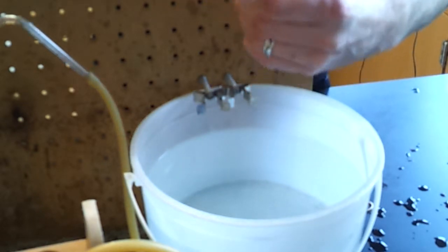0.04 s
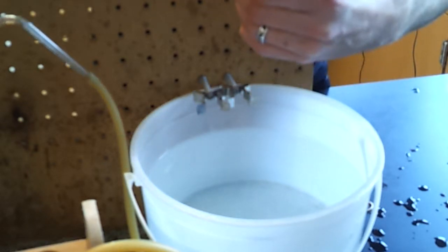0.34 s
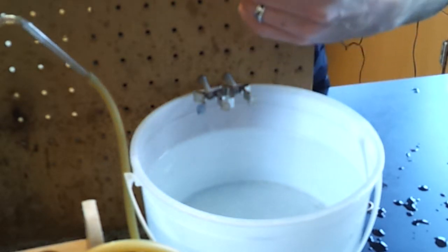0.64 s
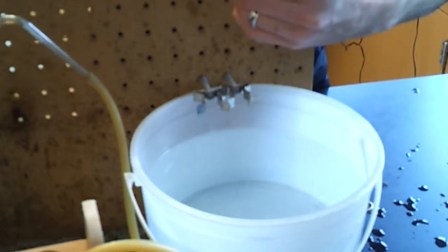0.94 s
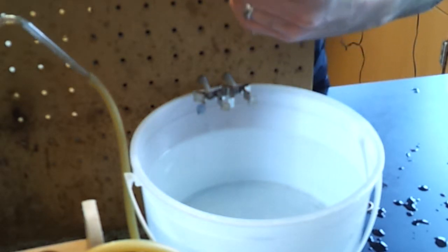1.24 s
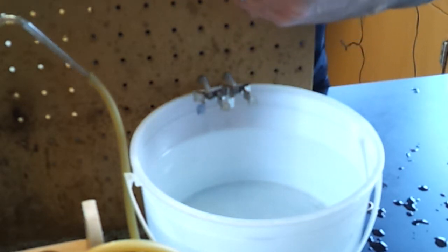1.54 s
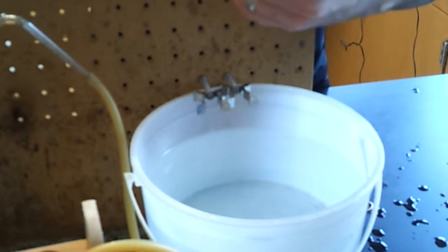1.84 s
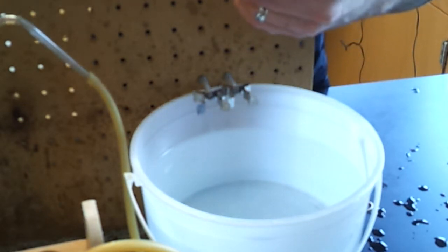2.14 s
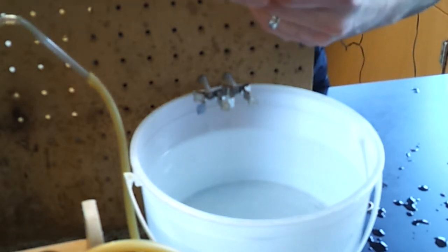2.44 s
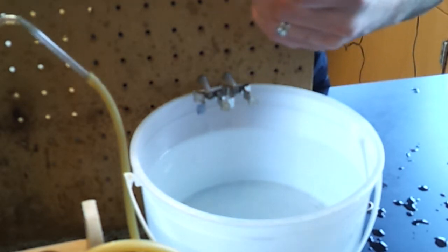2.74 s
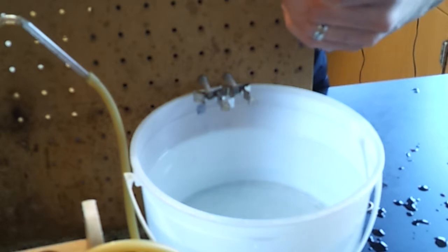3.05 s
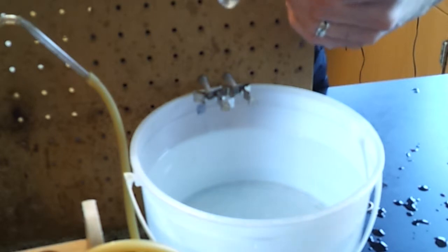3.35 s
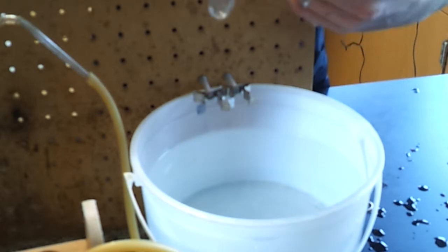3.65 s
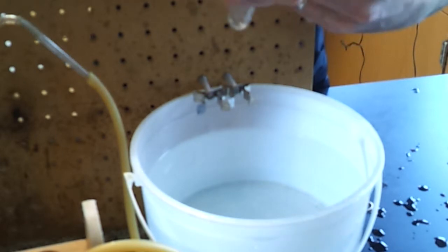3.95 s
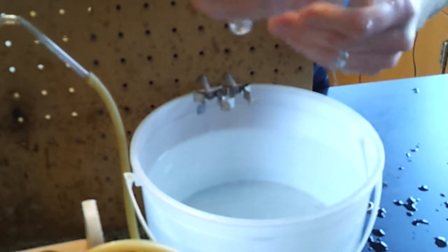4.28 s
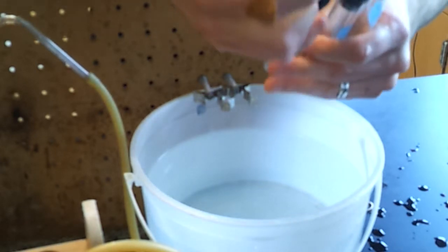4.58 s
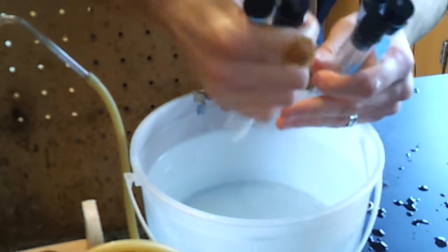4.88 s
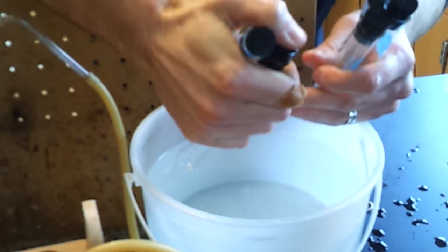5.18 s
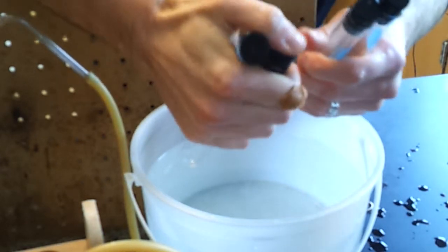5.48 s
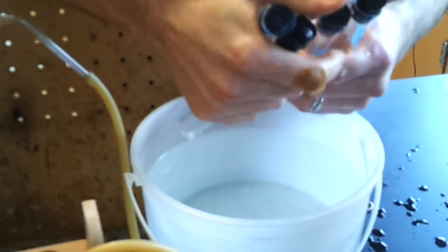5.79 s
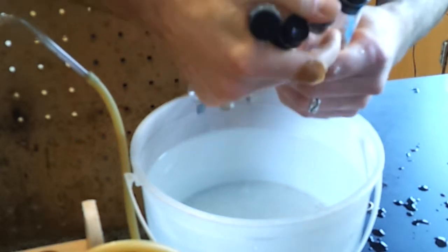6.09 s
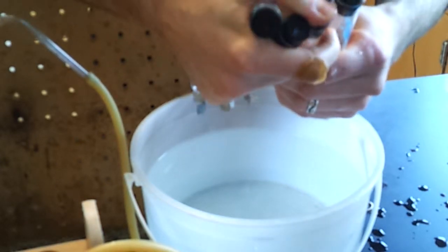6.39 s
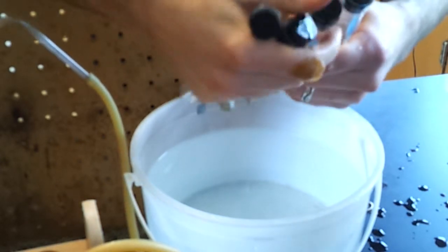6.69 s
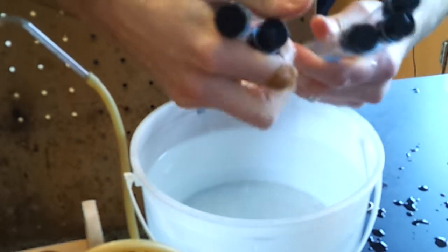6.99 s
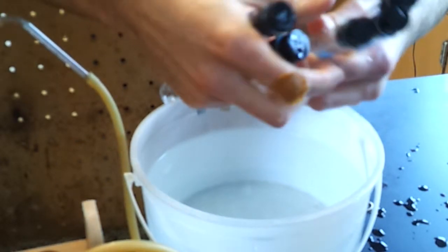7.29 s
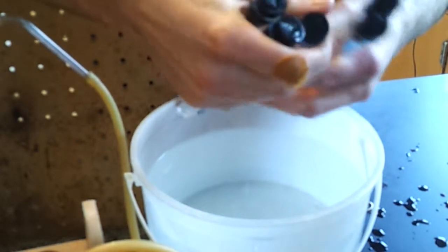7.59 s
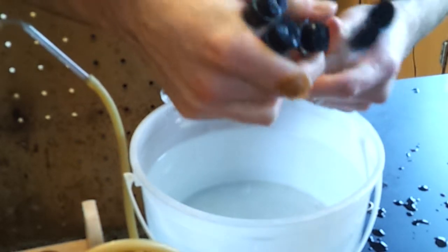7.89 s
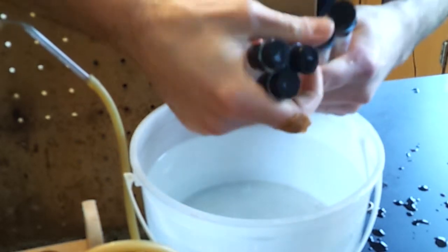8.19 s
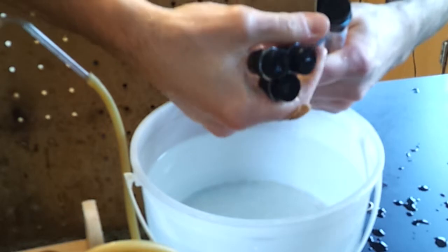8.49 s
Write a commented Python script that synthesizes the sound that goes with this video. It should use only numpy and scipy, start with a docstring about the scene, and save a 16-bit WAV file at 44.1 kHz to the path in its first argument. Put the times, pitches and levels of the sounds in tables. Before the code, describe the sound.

Ventilation rumbles and hums steadily in a small workshop, with a faint hiss. Capped plastic test tubes are handled close by, each click followed by a short room reflection. A faint slide comes just before 1 second, and caps catch in a brief rasping stutter around 1.5 seconds. A soft slide and a thin, quiet ring follow just after 2 seconds, then a light tap at 2.6. From 3.9 to 4.7 seconds the tubes clink and knock in a quick, uneven run, sharpest at 4.3 and 4.6. Small scraping ticks come at about 5.6 and 6 seconds. At 7.1 the caps stutter again, more strongly. The loudest clinks land at 7.5 and 7.9 seconds, the second with a small hollow bump. A few light ticks follow until about 8.3 seconds, leaving only the hum.

```python
"""Gathering plastic test tubes

Capped tubes pass from one hand into the other above a bucket in a small workshop. Their walls clink
and slide, and their caps knock and stutter past each other. One light touch leaves a thin ring, and
the bundle closes with a hollow bump. Bucket, bench and pegboard throw the clicks back, while
ventilation rumbles and hums underneath, along with a steady hiss."""
import sys
import numpy as np
from scipy import signal
from scipy.fft import rfft, irfft, next_fast_len
from scipy.io import wavfile
from scipy.ndimage import uniform_filter1d, minimum_filter1d

SR = 44100
rng = np.random.default_rng(int(sys.argv[2]) if len(sys.argv) > 2 else 0)


def dump_mix(stems):
    """Bounce the given channels to the path in sys.argv[1] as a 16-bit WAV at rate SR."""
    frames = np.atleast_2d(stems).T  # one column per channel
    limited = np.clip(frames, -1, 1)  # hard clip at full scale
    pcm = np.round(limited * 32767).astype(np.int16)
    wavfile.write(sys.argv[1], SR, pcm)


N = 376173

# Tube hits tube. Each row: start in seconds, relative levels of wall clink and cap knock in dB,
# hardness as a treble boost in dB, centre of the knock in Hz.
CONTACTS = [(2.2784, -48, -65, 4, 1580), (2.5733, -30.5, -43, -9, 2060), (3.9471, -27, -36, -6, 2680),
            (4.0632, -19.5, -33, -0.5, 2120), (4.2112, -40.5, -48.5, 1, 2530),
            (4.3022, -10.5, -27, -8.5, 3200), (4.4724, -37, -43, -6, 3300),
            (4.5374, -26.5, -44, -9.5, 2610), (4.592, -4.5, -26, -3, 2080),
            (4.6656, -22.5, -34.5, -10, 3040), (4.7312, -39, -55, 3, 2660),
            (7.4523, -21.5, -33.5, 11, 3370), (7.5423, -0.5, -36, 0.5, 2800), (7.722, -41, -46.5, -1, 2620),
            (7.794, -39, -56, -4, 2400), (7.8202, -24, -44.5, 3, 2600), (7.8534, -4.5, -22, 2.5, 2610),
            (8.157, -41, -62, 14, 2030), (8.221, -27, -44, -7, 2980)]
def strikes(bounce_above_db=-15, bounces=2, first_gap_s=0.006, gap_shrink=0.61, cap_loss_share=0.47):
    """List every hit. Hard ones bounce, ever sooner; the harder the hit, the less a bounce loses."""
    for start, clink_db, knock_db, hard_db, knock_hz in CONTACTS:
        yield start, clink_db, knock_db, hard_db, knock_hz
        if clink_db > bounce_above_db:
            loss_db = -1.5 * clink_db
            for k in range(1, bounces + 1):
                start += first_gap_s * gap_shrink ** (k - 1)
                yield start, clink_db - k * loss_db, knock_db - k * cap_loss_share * loss_db, hard_db, knock_hz


# The notes of a tube's wall, then of its cap and hollow inside.
# Each row: pitch in Hz, relative level in dB, seconds to fade by 60 dB.
WALL_NOTES = [(3930, -10, .06), (4175, -6, .06), (4487, -1, .07), (4763, -2, .17), (4899, -6, .17),
              (5055, -2, .05), (5185, -4, .11), (5355, -2, .06), (5508, 0, .09), (5767, -5, .08),
              (6055, -3, .05), (6250, -7, .04), (6650, -6, .04)]
CAP_NOTES = [(709, -14, 0.034), (1066, -5.5, .02), (1570, -11, 0.009), (2060, -4, 0.016), (2112, 8.5, 0.03),
             (2360, 2.5, 0.024), (2520, -2, 0.031), (2770, -7, 0.02), (3100, -15, 0.026), (3500, 0, .02)]
# The crack as wall or cap is hit. Each row: frequency in Hz, relative level in dB.
WALL_CRACK = [(300, -80.5), (1500, -48), (3000, -22.5), (3900, -11.5), (4500, 1), (5000, 2), (5500, 1.5),
              (6100, -9.5), (6700, -14), (7300, -19.5), (9000, -23.5)]
CAP_CRACK = [(100, -56), (500, -25.5), (1250, -10.5), (1650, -3.5), (2600, -2), (3400, 1), (4300, -3.5),
             (8000, -34)]
def tube_clinks(wall_db, cap_db, knock_width_hz, ring_send_db):
    """Each hit sounds both wall and cap. Returns the direct sound and the part sent into the room."""
    t = np.arange(SR // 3) / SR
    direct, sent = np.zeros((2, N))
    for start, clink_db, knock_db, hard_db, knock_hz in strikes():
        # Hard hits shake the tubes free to ring; after light ones the fingers still damp them.
        ring_db = 5 + 0.2 * clink_db
        force = pulse([(4500, 0.0029), (5700, hard_db)])   # hard contact favours the high notes
        wall = blow(WALL_NOTES, WALL_CRACK, t, ring_db - 7.5)
        wall = signal.fftconvolve(wall, force[None])[:, :len(t)]
        cap = blow(CAP_NOTES, CAP_CRACK, t, ring_db - 6.5)
        cap = resonate(cap, knock_hz, knock_width_hz)
        clink = from_db(clink_db + wall_db) * unit_energy(wall)
        knock = from_db(knock_db + cap_db) * unit_energy(cap)
        crack, ring = clink + knock
        add(direct, start, crack + ring)
        # Light touches lie deep in the hand and are heard more by way of the room.
        send_db = -4 - 0.1949 * clink_db
        add(sent, start, from_db(send_db) * (crack + from_db(ring_send_db) * ring))
    return direct, sent


def blow(notes, crack_shape, t, ring_db):
    """One hit as two rows: a sharp crack, and the ringing damped by the hand."""
    crack = np.zeros(len(t))
    add(crack, 0, pulse(crack_shape))
    ring = unit_energy(ringing(notes, t, vary_db=2.5, detune=0.00046))
    return np.array([crack, from_db(ring_db) * ring])


# Cap catches on cap. Each row: start in seconds, length in seconds, number of slips,
# relative levels of the last rasp and of the caps' tone in dB.
STUTTERS = [(1.5088, 0, 1, -42, -51), (1.5276, 0.0604, 4, -28, -39.5), (1.6206, 0, 1, -33, -41),
            (3.8991, 0.0035, 1, -38, -45.5), (5.554, 0, 1, -48, -43.5), (5.593, 0.0016, 1, -47, -50),
            (5.9653, 0.0033, 1, -37, -39.5), (7.09, 0.0243, 5, -22, -37), (8.1249, 0, 1, -38, -42),
            (8.313, 0.0025, 1, -44, -64)]
def cap_slips(held_db=-9.5):
    """List the evenly spaced slips. Those that catch again rasp less than the last, which breaks free."""
    for start, length, slips, rasp_db, tone_db in STUTTERS:
        for held_at in np.linspace(start, start + length, slips)[:-1]:
            yield held_at, rasp_db + held_db, tone_db
        yield start + length, rasp_db, tone_db


# The rasp of one slip. Each row: frequency in Hz, relative level in dB.
RASP_SHAPE = [(200, -50), (900, -27), (1500, -18), (2200, -1.5), (3000, -10.5), (3900, 0), (4600, 3.5),
              (5300, 7), (6200, -5.5), (7000, -11), (8500, -25)]
# Two caps ringing. Each row: pitch in Hz, relative level in dB, seconds to fade by 60 dB.
CAP_PAIR_NOTES = [(1860, -7, .012), (2050, -2.5, 0.015), (2148, 2.5, 0.028), (2420, -7.5, 0.021),
                  (2560, -9, 0.0095)]
def cap_stutters(rasp_gain_db, tone_gain_db, slip_s):
    """Each slip is a short rasp that sets the caps ringing near one note."""
    t = np.arange(SR // 8) / SR
    out = np.zeros(N)
    for start, rasp_db, tone_db in cap_slips():
        rasp = unit_energy(shaped_noise(RASP_SHAPE, len(t)) * np.exp(-t / slip_s))
        tone = unit_energy(ringing(CAP_PAIR_NOTES, t, vary_db=3, detune=0.015))
        add(out, start, from_db(rasp_db + rasp_gain_db) * rasp + from_db(tone_db + tone_gain_db) * tone)
    return out


# Tube slides on tube. Each row: start in seconds, length in seconds, level in dB, pitch in Hz.
SLIDES = [(0.742, 0.079, -58.5, 4900), (.93, 0.037, -67, 5000), (2.137, 0.048, -56.5, 4470),
          (3.905, 0.042, -62, 2300)]
def tube_slides(slips_per_s, width_hz):
    """Many tiny slips keep one note of a tube sounding while it slides."""
    out = np.zeros(N)
    for start, length, db, hz in SLIDES:
        size = int(length * SR)
        slips = rng.standard_normal(SR) * (rng.random(SR) < slips_per_s / SR)
        rub = unit_rms(resonate(slips[:size], hz, width_hz))
        add(out, start, from_db(db) * rub * signal.windows.tukey(size))
    return out


# The thin ring and the hollow bump. Each holds: start in seconds, level in dB.
PING = (2.151, -52)
BUMP = (7.854, -36)
# Their notes. Each row: pitch in Hz, relative level in dB, seconds to fade by 60 dB.
PING_NOTES = [(1610, -7, 1), (2428, -9, .15), (4400, 0, 0.36), (4759, -12, 0.31), (6950, 2, 0.18)]
BUMP_NOTES = [(695, -5.5, 0.15), (920, 1, 0.04), (1130, -7, 0.09), (2635, 10, 0.079), (2800, -3, 0.1)]
def ping_and_bump():
    """Two single touches on loosely held pieces, which are free to ring on."""
    t = np.arange(SR) / SR
    out = np.zeros(N)
    for (start, db), notes in [(PING, PING_NOTES), (BUMP, BUMP_NOTES)]:
        add(out, start, from_db(db) * ringing(notes, t, vary_db=4, detune=0))
    return out


# Echoes from bucket, bench and pegboard. Each row: delay in seconds, relative level in dB.
ECHOES = [(.0026, -29.5), (.0068, -7), (0.0127, -20.5), (0.0163, -20)]
def workshop(sound, early_db, early_fade_s, late_db, late_fade_s):
    """The room answers with a few hard echoes, quick scatter from nearby clutter, then a longer tail."""
    t = np.arange(SR // 2) / SR
    response = from_db(early_db) * scatter(t, early_fade_s, onset_s=0.00042)
    response += from_db(late_db) * scatter(t, late_fade_s, onset_s=0.014)
    for delay, db in ECHOES:
        response[round(delay * SR)] += from_db(db)
    return signal.fftconvolve(sound, response)[:N]


def scatter(t, fade_s, onset_s):
    """Countless small echoes build up and die away, favouring no pitch."""
    build_up = 1 - np.exp(-(t / onset_s) ** 2)
    spectrum = rfft(rng.standard_normal(len(t)) * build_up * fade(t, fade_s))
    local_power = uniform_filter1d(np.abs(spectrum) ** 2, size=150)
    evened = irfft(spectrum / np.sqrt(local_power), len(t))
    return unit_energy(evened * (1 - t / t[-1]))


# Fan, motor and duct tones. Each row: pitch in Hz, width in Hz, level in dB.
HUM_TONES = [(24.74, 0.98, -64.5), (120.1, 3.8, -62), (168.3, 12, -63), (353, 5.8, -69.5), (703.2, 17, -66),
             (728.3, 17, -66), (806, 23, -69.5)]
# The rumble of the air. Each row: frequency in Hz, relative level in dB.
RUMBLE_SHAPE = [(11, -29.5), (18, 6.5), (35, -5), (49, -4.5), (92, -7.5), (119, -2.5), (151, -6.5),
                (179, -4), (236, -9), (354, -11), (629, -16), (702, -14), (910, -21), (1040, -17.5),
                (1500, -28), (1950, -61), (3300, -120)]
def ventilation(rumble_db):
    """Moving air rumbles under the wavering tones of fan, motor and duct."""
    hum = np.zeros(N)
    for hz, width_hz, db in HUM_TONES:
        tone = resonate(rng.standard_normal(N + SR), hz, width_hz)[SR:]   # skip the build-up
        hum += from_db(db) * unit_rms(tone)
    return hum + from_db(rumble_db) * shaped_noise(RUMBLE_SHAPE, N)


# The background hiss. Each row: frequency in Hz, relative level in dB.
HISS_SHAPE = [(700, -16), (1400, 2.5), (2300, -1), (3400, -4), (4300, -2.5), (5200, 0), (6000, -7),
              (7000, -11.5), (7500, -13), (8000, -28), (9000, -33)]
def hiss(level_db):
    """A faint, steady hiss lies behind everything."""
    return from_db(level_db) * shaped_noise(HISS_SHAPE, N)


def ringing(notes, t, vary_db, detune):
    """Fading notes, whose strength and tuning can vary with the tube and the spot touched."""
    hz, db, fade_s = np.transpose(notes)[:, :, None]
    weight, shift = rng.standard_normal((2, len(notes), 1))
    strength = rng.choice([-1, 1], hz.shape) * from_db(db + vary_db * weight)
    waves = np.sin(2 * np.pi * hz * (1 + detune * shift) * t)
    return np.sum(strength * fade(t, fade_s) * waves, axis=0)


def resonate(x, hz, width_hz):
    """Let through a band of sound around one pitch."""
    r = np.exp(-np.pi * width_hz / SR)
    feedback = [1, -2 * r * np.cos(2 * np.pi * hz / SR), r * r]
    return signal.lfilter(np.array([1, 0, -1]) * (1 - r * r) / 2, feedback, x)


def shape_gains(shape, size):
    """Join (Hz, dB) points into a gain for every frequency."""
    hz, db = np.transpose(shape)
    bins = np.maximum(np.fft.rfftfreq(size, 1 / SR), 1)
    return from_db(np.interp(np.log(bins), np.log(hz), db))


def pulse(shape, size=2048):
    """The shortest click with the given (Hz, dB) shape."""
    cepstrum = irfft(np.log(shape_gains(shape, size)))
    spectrum = np.exp(rfft(2 * cepstrum[:size // 2], size) - cepstrum[0])   # packs energy at the start
    return unit_energy(irfft(spectrum))


def shaped_noise(shape, size):
    """Noise with the given (Hz, dB) shape."""
    padded = next_fast_len(size)
    gains = shape_gains(shape, padded)
    phases = np.exp(2j * np.pi * rng.random(len(gains)))
    return unit_rms(irfft(gains * phases, padded)[:size])


def from_db(db):
    """Turn decibels into a gain."""
    return 10 ** (np.asarray(db) / 20)


def unit_rms(x):
    """Scale to an average power of one."""
    return x / np.sqrt(np.mean(x ** 2) + 1e-20)


def unit_energy(x):
    """Scale to a total energy of one."""
    return x / np.sqrt(np.sum(x ** 2) + 1e-20)


def fade(t, fade_s):
    """Die away by 60 dB in fade_s seconds."""
    return np.exp(-np.log(1000) * t / fade_s)


def add(track, start_s, sound):
    """Mix a sound into the track."""
    start = round(start_s * SR)
    track[start:start + len(sound)] += sound[:N - start]


def scene():
    """The handled tubes, their room and the background, in one channel."""
    clinks, sent = tube_clinks(wall_db=12, cap_db=18, knock_width_hz=1340, ring_send_db=-8.5)
    rubbing = cap_stutters(rasp_gain_db=13.5, tone_gain_db=17, slip_s=0.0022)
    rubbing += tube_slides(slips_per_s=2700, width_hz=310)
    rings = ping_and_bump()
    sent += from_db(-0.6) * rubbing
    room = workshop(sent, early_db=-1, early_fade_s=0.075, late_db=-9, late_fade_s=0.5)
    background = ventilation(rumble_db=-51) + hiss(level_db=-60.5)
    return (clinks + rubbing + rings + room + background)[None]


def record(dry):
    """A small microphone dulls the treble; a fast limiter turns down the hardest clinks."""
    treble_hz, cutoff_hz, ceiling = 6650, 9500, 0.7
    heard = signal.sosfilt(signal.butter(8, treble_hz, fs=SR, output="sos"), dry)
    needed_gain = ceiling / np.maximum(np.abs(heard), ceiling)
    gain = uniform_filter1d(minimum_filter1d(needed_gain, size=15), size=15)
    return signal.sosfilt(signal.cheby2(12, 50, cutoff_hz, fs=SR, output="sos"), heard * gain)


dry = scene()
out = record(dry)
dump_mix(out)
```